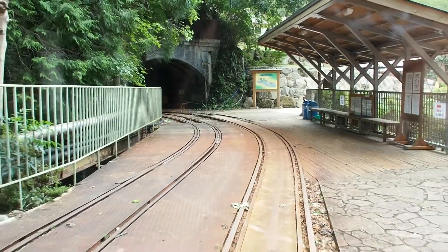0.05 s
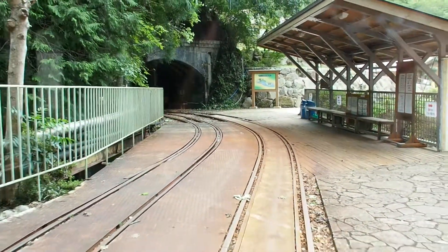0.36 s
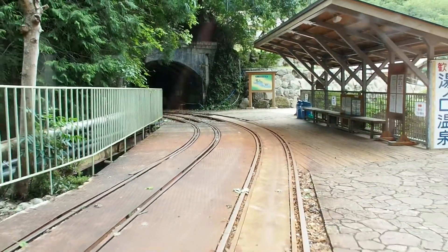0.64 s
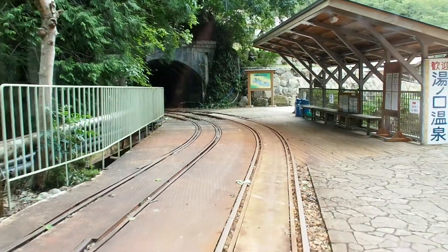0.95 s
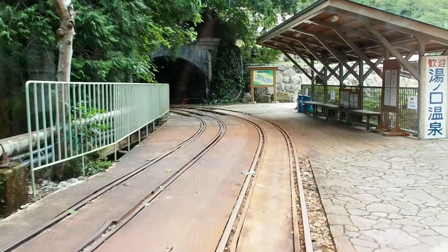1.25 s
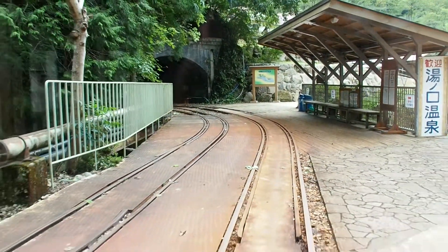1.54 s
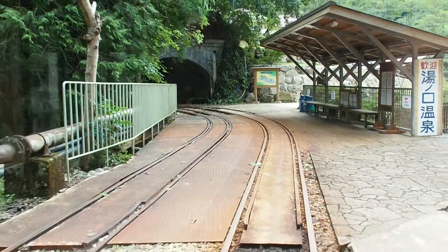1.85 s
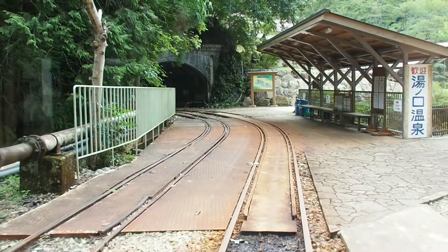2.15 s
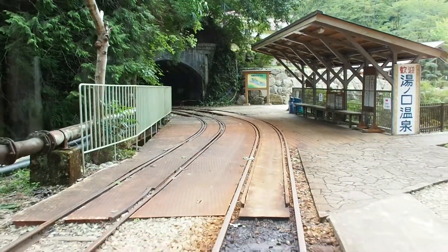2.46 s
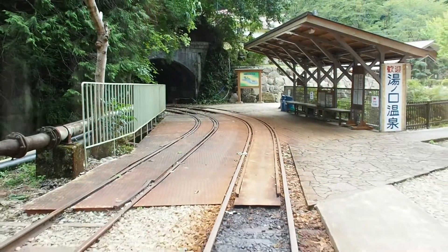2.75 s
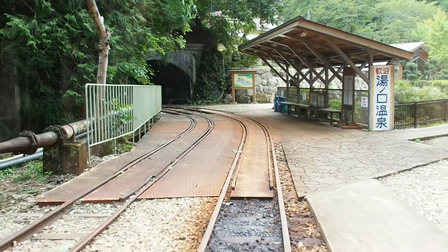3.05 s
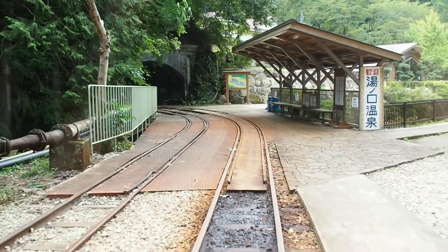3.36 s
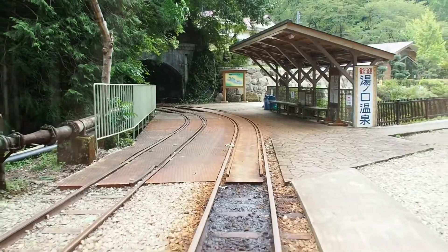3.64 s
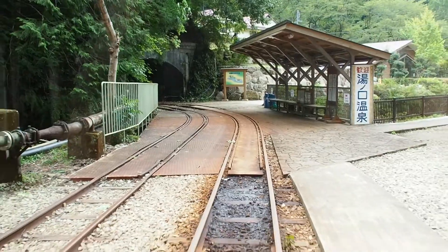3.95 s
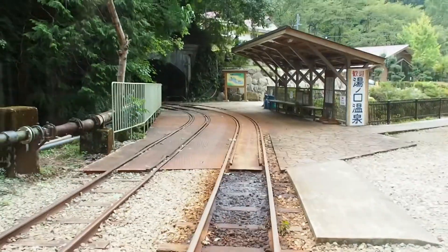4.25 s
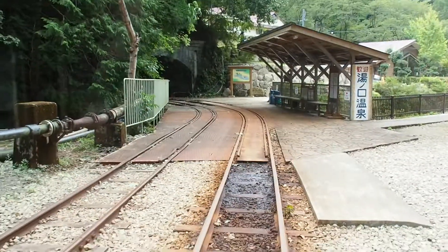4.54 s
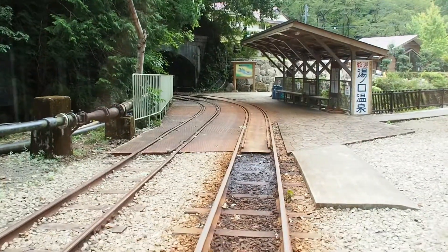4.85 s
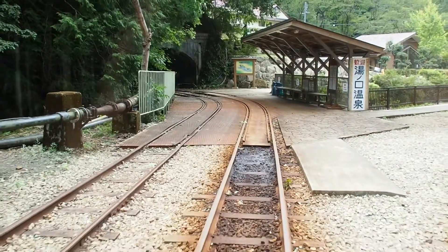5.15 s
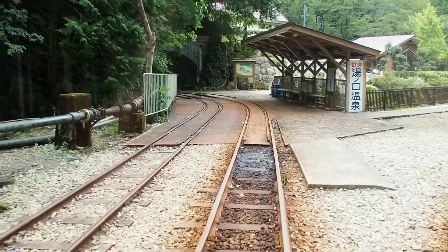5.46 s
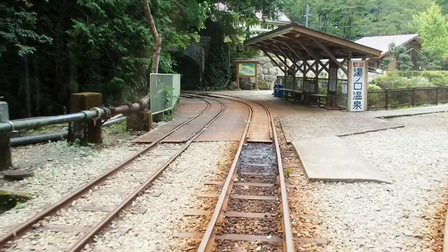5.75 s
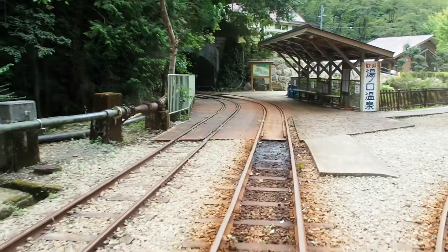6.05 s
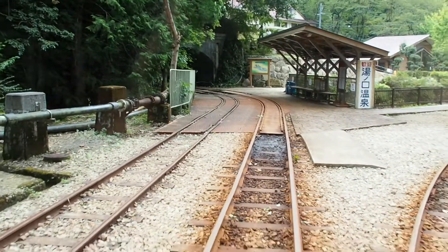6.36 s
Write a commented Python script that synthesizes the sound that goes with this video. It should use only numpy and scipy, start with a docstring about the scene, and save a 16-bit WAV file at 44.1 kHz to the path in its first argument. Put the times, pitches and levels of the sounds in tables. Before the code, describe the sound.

Inside a small rail car rolling slowly over rough track, the floor and cabin boom with a continuous deep rumble, while steel wheels add a softer humming roar. Bumps land as dull, uneven thuds. Loose windows and fittings rattle in quick bursts throughout, with light ticking and a few brief metallic pings. The microphone rides in the hard little cabin, surrounded by its short echoes.

```python
"""A deep boom, thuds and bursts of chatter inside a small rail car rolling slowly over rough track.
The wheels shake the floor and cabin, so they boom, with a thud at each bump; steel on steel adds a roar.
Loose windows and fittings knock in their frames about eleven times a second, and echoes from the hard
little cabin smear each burst. Small fittings tick all the time, and now and then a metal one pings."""
import sys
import numpy as np
from scipy import signal
from scipy.fft import rfft, irfft
from scipy.io import wavfile
from scipy.ndimage import uniform_filter1d

SR = 44100
rng = np.random.default_rng(int(sys.argv[2]) if len(sys.argv) > 2 else 0)


def wav_out(sig):
    """Save sig, one row per channel (or a flat mono array), as 16-bit PCM at SR to the path in sys.argv[1]."""
    wavfile.write(sys.argv[1], SR, np.round(np.clip(np.atleast_2d(sig).T, -1, 1) * 32767).astype(np.int16))


N = 291060
SIDE_DELAY_S = .00019  # time sound takes between the left and right listening points


def gain_of(db):
    """Turns decibels into a number to multiply a sound by."""
    return 10 ** (np.asarray(db) / 20)


def unit_level(x):
    """Scales a sound to an average (rms) level of one."""
    return x / np.sqrt(np.mean(x ** 2) + 1e-20)


def value_at(points, hz):
    """Looks up a value between the rows of a table, with octaves evenly spaced."""
    f, value = np.transpose(points)
    return np.interp(np.log(hz + 1), np.log(f + 1), value)


def add(mix, s, sound):
    """Mixes a sound in, starting at s seconds."""
    part = mix[..., max(round(s * SR), 0):][..., :sound.shape[-1]]
    part += sound[..., :part.shape[-1]]


def tone_colour(outline, peaks, hz):
    """The gain at each frequency: a broad outline with peaks where the object rings."""
    peaks_db = sum(db / (1 + ((hz - f) / width) ** 2) for f, width, db in peaks)
    return gain_of(value_at(outline, hz) + peaks_db)


def ring_after_hit(gain):
    """Makes a tone colour ring only after the hit, never before (minimum phase)."""
    log_gain = np.log(np.maximum(np.r_[gain, gain[-2:0:-1]], 1e-6))
    return np.exp(np.conj(signal.hilbert(log_gain)))[:len(gain)]


def from_all_sides(spectra, hz):
    """Blends two unrelated sounds into left and right: alike in the bass, different in the treble."""
    alike = np.sinc(2 * hz * SIDE_DELAY_S)
    mid, side = np.sqrt((1 + alike) / 2) * spectra[0], np.sqrt((1 - alike) / 2) * spectra[1]
    return np.array([mid + side, mid - side])


def steadied(x, seconds):
    """Evens out the slow swells of a noise, so that the track decides its level."""
    power = uniform_filter1d(np.mean(np.atleast_2d(x) ** 2, 0), int(seconds * SR))
    return x / np.sqrt(uniform_filter1d(power, int(seconds * SR / 2)) + 1e-12)


def shaking_db():
    """How hard the wheels shake the car at every moment."""
    # roughness of the ride: t/s, level/dB
    ride = [(0.0, -17), (0.25, -17), (0.47, -13), (0.62, -18), (0.87, -18), (1.0, -13.5), (2.07, -15.5),
            (2.36, -12), (3.1, -14.5), (3.67, -14), (3.83, -23.5), (4.02, -16.5), (4.78, -18.5),
            (5.02, -17.5), (5.65, -18), (5.92, -14.5), (6.15, -22.5), (6.6, -17)]
    return np.interp(np.arange(N) / SR, *np.transpose(ride))


def extra_shaking_db():
    """How far the shaking is above or below its average."""
    shake_db = shaking_db()
    return shake_db - shake_db.mean()


def random_hits(shape, per_s, spread_db):
    """Single clicks at random times, some harder than others."""
    hits = rng.random(shape) < per_s / SR
    return hits * gain_of(spread_db * np.clip(rng.standard_normal(shape), -2, 2))


def cabin_knock(hz, size, direct=0.5, echoes_per_s=5000):
    """The spectrum of one knock of a loose part: it arrives directly, then bounces off the walls."""
    # tone of the knock: f/Hz, level/dB
    knock_tone = [(120, -9.5), (400, -1), (750, -4), (1050, -3.5), (1550, 0.5), (2050, -4), (2600, 0),
                  (3400, -3), (4400, -9.5), (5500, -21), (6300, -20), (7000, -16.5), (9400, -21.5),
                  (11200, -27.5), (15500, -34.5)]
    # ringing of the panes and frames: f/Hz, half-width/Hz, boost/dB
    pane_rings = [(1320, 30, 3), (1430, 35, 6), (2798, 45, 6), (3387, 45, 5), (4562, 45, 7.5),
                  (7345, 40, 4), (8895, 60, 4.5), (9382, 55, 5)]
    # how long the cabin echoes: f/Hz, time to fade by 60 dB/s
    echo_times = [(300, 0.26), (1500, 0.18), (4000, 0.14), (12000, 0.16)]
    echoes = rng.standard_normal((2, size)) * (rng.random((2, size)) < echoes_per_s / SR)
    f, t, bands = signal.stft(echoes, SR, nperseg=256)
    fade = gain_of(-60 * t / value_at(echo_times, f)[:, None])
    tail = signal.istft(bands * fade, SR, nperseg=256)[1][:, :size]
    walls = from_all_sides(rfft(tail / np.linalg.norm(tail, axis=1, keepdims=True)), hz)
    delay_s = SIDE_DELAY_S * (1 + rng.uniform(-0.12, 0.28) * np.array([[1], [-1]]))
    straight = direct * np.exp(-2j * np.pi * hz * delay_s)
    return (walls + straight) * ring_after_hit(tone_colour(knock_tone, pane_rings, hz))


def fitting_ticks(level_db=-37, follow=0.57, ticks_per_s=60, db_per_octave=0.5, count=4, size=8192):
    """Small fittings tick lightly all the time, louder when the car shakes harder."""
    hz, out = np.fft.rfftfreq(size, 1 / SR), np.zeros((2, N))
    treble_lift = gain_of(db_per_octave * np.log2(np.maximum(hz, 500)))
    for _ in range(count):
        hits = random_hits(N, ticks_per_s / count, spread_db=5)
        tick = irfft(treble_lift * cabin_knock(hz, size))
        out += signal.oaconvolve(hits[None], tick, axes=1)[:, :N]
    return gain_of(level_db + follow * extra_shaking_db()) * unit_level(out)


def fitting_pings(level_db=-1.5, rise_s=0.003):
    """A small loose metal fitting is struck and rings briefly, a little to the right."""
    # strikes on the fitting: t/s, level/dB
    strikes = [(1.205, -23), (2.42, -32), (3.092, -22), (3.74, -25), (5.069, -39), (5.691, -54)]
    # the tones it rings with: f/Hz, level/dB, time to fade by 60 dB/s
    tones = [(4562, 0, .15), (4600, -7, .07), (6771, -15, .12), (10510, -21, .1)]
    out, t = np.zeros((2, N)), np.arange(SR // 4) / SR
    for s, strike_db in strikes:
        ring = sum(gain_of(db - 60 * t / fade_s) * np.sin(2 * np.pi * (hz * t + rng.random((2, 1))))
                   for hz, db, fade_s in tones)
        add(out, s, gain_of(level_db + strike_db) * ring * (1 - np.exp(-t / rise_s)))
    return out * gain_of([[-2.5], [2.5]])


def wheel_roar(level_db=-12, follow=1.18):
    """Steel rolling on steel hums through the frame under the floor, louder on rougher track."""
    # tone of the wheels on the rail: f/Hz, level/dB
    roar_tone = [(20, -47), (150, -2), (330, 0.5), (560, -2), (800, -5), (1400, -8.5), (2500, -16.5),
                 (4000, -21), (6000, -36.5), (10000, -38.5), (16000, -46)]
    # ringing of the wheels and frame: f/Hz, half-width/Hz, boost/dB
    frame_rings = [(400, 18, 14), (491, 17, 6)]
    hz = np.fft.rfftfreq(N, 1 / SR)
    noise = from_all_sides(rfft(rng.standard_normal((2, N))), hz)
    roar = steadied(irfft(noise * tone_colour(roar_tone, frame_rings, hz), N), seconds=0.57)
    return roar * gain_of(level_db + shaking_db().mean() + follow * extra_shaking_db())


def cabin_boom(level_db=-1.12, low_hz=31, high_hz=300, between_peaks_db=-21, spread_hz=105):
    """Rough rails make the floor and cabin boom at their own deep pitches."""
    # pitches of the floor and cabin: f/Hz, width/Hz, level/dB
    body_rings = [(47, 16, -20), (75.6, 12.4, -6), (83.8, 6.6, 2), (134.2, 38, -0.5), (146.2, 7, 0.5),
                  (186.8, 7.2, -3.5), (201, 16, -6), (231, 18.3, -5), (297, 11, -11.5)]
    hz = np.fft.rfftfreq(N, 1 / SR)
    peaks = sum(gain_of(db) ** 2 / (1 + ((hz - f) / width) ** 2) ** 2 for f, width, db in body_rings)
    bass_band = hz ** 4 / (hz ** 4 + low_hz ** 4) / (1 + (hz / high_hz) ** 8)
    power = (peaks + gain_of(between_peaks_db) ** 2) * bass_band
    # the deepest tones fill the cabin evenly, the same left and right
    noise = from_all_sides(rfft(rng.standard_normal((2, N))), hz / (1 + (spread_hz / (hz + 1)) ** 6))
    boom = steadied(irfft(noise * np.sqrt(power), N), seconds=0.27)
    return boom * gain_of(level_db + shaking_db())


def track_thuds(level_db=-2, rise_s=0.0079, frame_db=-13, frame_hz=398, frame_fade_s=0.21, clunk_db=-12):
    """Each bump heaves the floor and rings the frame under it; higher thuds clunk more as well."""
    # bumps in the track: t/s, level/dB, thud f/Hz
    bumps = [(0.096, -3.5, 106), (0.394, -7, 125), (0.448, -9, 136.4), (1.326, -14, 134), (1.432, -6, 104),
             (2.292, -8, 167.8), (2.38, -2, 148), (2.53, -10, 171), (2.593, -6, 177.7), (2.647, -3, 171),
             (2.882, -6, 141), (2.938, -6.5, 139), (3.188, -4, 140), (3.659, -9, 124), (4.414, -4, 201),
             (5.182, -7, 132), (5.754, -10, 152), (5.895, -1, 205), (5.984, -5.5, 191), (6.296, -9, 126),
             (6.395, -9.5, 118)]
    out, t = np.zeros(N), np.arange(SR // 5) / SR
    clunk_band = signal.butter(2, [310, 620], "bandpass", fs=SR, output="sos")
    push = (t / rise_s * np.exp(1 - t / rise_s)) ** 1.8
    ring = gain_of(frame_db - 60 * t / frame_fade_s) * np.sin(2 * np.pi * frame_hz * t)
    for s, db, hz in bumps:
        thud = np.sin(2 * np.pi * (hz * t + rng.random()))
        noise = unit_level(signal.sosfilt(clunk_band, rng.standard_normal(len(t))))
        clunk = gain_of(clunk_db) * (hz / 200) ** 2 * noise
        add(out, s, gain_of(db + level_db) * (push * (thud + clunk) + ring))
    return out


def chatter_bursts(rock_s=.092, uneven_s=.008, soft_swell_s=0.0099,
                   soft_db=-28.5, spread_db=2.5, follow=.6, loosen_db_per_s=1.32):
    """Lists the hard bursts, plus soft ones in the gaps, where the loose parts keep rocking."""
    # hard bursts of chatter: t/s, level/dB, swell from t to the peak/s
    hard = [(0.186, -20, .025), (0.452, -22, 0.01), (0.523, -16, 0.013), (0.933, -23, .02),
            (1.122, -14, 0.011), (1.19, -16.5, 0.017), (1.295, -23, 0.015), (1.359, -22, 0.022),
            (1.532, -21, .01), (1.647, -16.5, 0.0059), (1.688, -17, .017), (1.816, -21.5, 0.015),
            (1.89, -13.5, 0.013), (2.16, -21.5, 0.015), (2.241, -19.5, 0.014), (2.648, -19.5, .013),
            (2.692, -22, 0.0089), (2.766, -20.5, 0.019), (2.862, -17, .014), (2.952, -22, 0.01),
            (3.041, -21, .004), (3.082, -19.5, 0.011), (3.358, -15.5, .02), (3.483, -16.5, 0.0097),
            (3.565, -16, 0.011), (3.659, -16.5, 0.0098), (3.72, -18.5, 0.015), (3.887, -19, 0.014),
            (3.966, -21.5, 0.02), (4.03, -22, .015), (4.07, -18.5, .009), (4.15, -14, .02),
            (4.285, -17, 0.024), (4.489, -25.5, 0.0096), (4.559, -23, 0.0084), (4.619, -19, 0.019),
            (4.881, -22.5, 0.016), (4.95, -16, 0.021), (5.06, -14, 0.014), (5.16, -19.5, .014),
            (5.218, -18, .018), (5.278, -21, 0.014), (5.34, -21, 0.006), (5.368, -18, 0.0088),
            (5.4, -19.5, .018), (5.544, -21, 0.021), (5.67, -18, 0.015), (5.771, -23.5, 0.0061),
            (5.84, -22.5, 0.02), (5.928, -21.5, 0.0084), (6.172, -22.5, 0.01), (6.501, -15, 0.013),
            (6.576, -21.5, 0.0045)]
    shake_db = extra_shaking_db()
    edges, soft = [0] + [s for s, _, _ in hard] + [N / SR], []
    chance = iter(rng.standard_normal((N // 1000, 2)))
    for start, end in zip(edges, edges[1:]):
        rocks = max(round((end - start) / rock_s), 1)
        for s in np.linspace(start, end, rocks + 1)[1:-1]:
            late, harder = next(chance)
            # the parts chatter more freely as the car rolls on
            db = soft_db + follow * shake_db[int(s * SR)] + loosen_db_per_s * (s - N / SR / 2)
            soft.append((s + uneven_s * late, db + spread_db * harder, soft_swell_s))
    return list(hard) + soft


def window_chatter(level_db=1.63, knocks_per_s=260, scrape=0.051, head_start=.55, count=14, size=8192):
    """Loose windows and fittings knock quickly, three at a time, in bursts that swell and die away."""
    out, t, hz = np.zeros((2, N)), np.arange(size) / SR, np.fft.rfftfreq(size, 1 / SR)
    parts = np.array([cabin_knock(hz, size) for _ in range(count)])
    octaves = np.log2(np.maximum(hz, 500) / 2000)
    treble = 1 / (1 + (4600 / (hz + 1)) ** 4)
    burst_scale = np.sqrt(0.028 * SR / size)  # a burst has the energy of 28 ms at its level
    for s, db, swell_s in chatter_bursts():
        shaken = parts[rng.choice(count, size=3, replace=False)]
        shape = (len(shaken), size)
        rise_s = swell_s * (1 + head_start)  # the parts start to stir a little early
        force = (t / rise_s * np.exp(1 - t / rise_s)) ** 2.15
        knocks = random_hits(shape, knocks_per_s, spread_db=4.0)
        knocks[0, int(rise_s * SR * .85)] = 1.33  # one sure knock as the shaking nears its peak
        drive = force * (knocks * rng.choice([-1, 1], shape) + scrape * rng.standard_normal(shape))
        # harder knocks are shorter, so only they reach the top of the treble
        blows = (1 - treble) * rfft(unit_level(drive)) + treble * rfft(unit_level(drive * abs(drive)))
        # harder bursts and later bursts sound brighter
        db_per_octave = 0.1555 * (db + 14) + 0.17 * (s - N / SR / 2)
        burst = irfft((blows[:, None] * shaken).sum(0) * gain_of(db_per_octave * octaves))
        add(out, s - head_start * swell_s, gain_of(db + level_db) * unit_level(burst) * burst_scale)
    return out


def scene():
    """The bass is nearly the same on both sides; the chatter fills the cabin."""
    bass = cabin_boom() + track_thuds()
    clatter = wheel_roar() + window_chatter() + fitting_pings() + fitting_ticks()
    return bass + clatter * gain_of([[-.2], [.2]])


def record(dry, ceiling=1.0, top_hz=15800):
    """Rounds off the loudest peaks and cuts the very highest treble."""
    rounded = dry / (1 + (dry / ceiling) ** 8) ** (1 / 8)
    treble_cut = signal.firwin(511, top_hz, window=("kaiser", 9), fs=SR)
    return signal.oaconvolve(rounded, treble_cut[None], "same")


dry = scene()
out = record(dry)
wav_out(out)
```